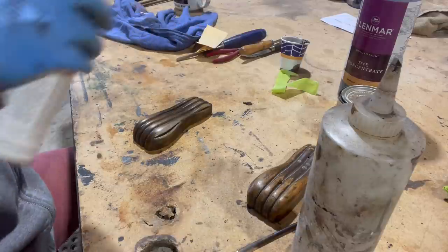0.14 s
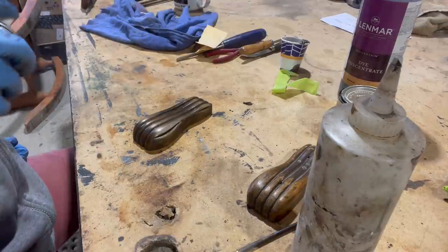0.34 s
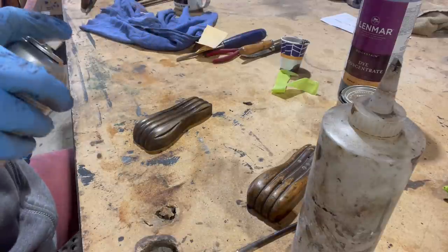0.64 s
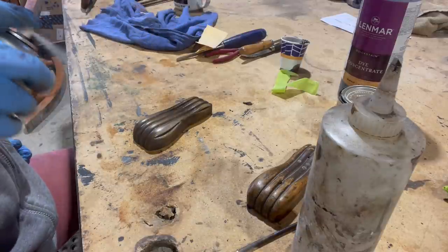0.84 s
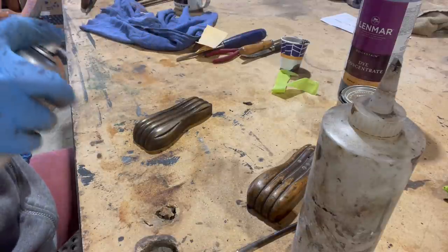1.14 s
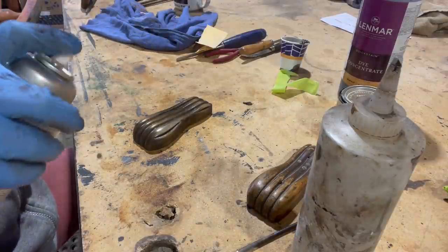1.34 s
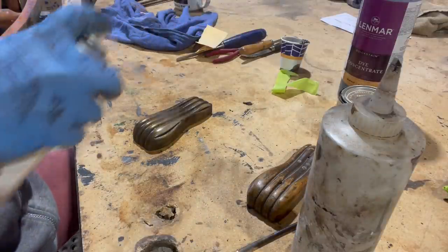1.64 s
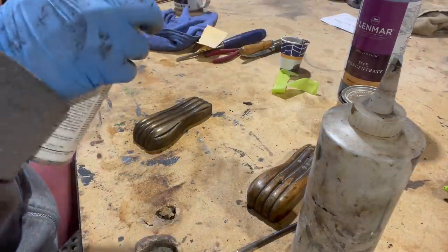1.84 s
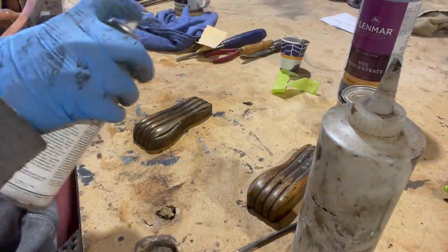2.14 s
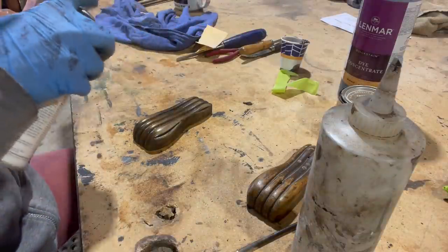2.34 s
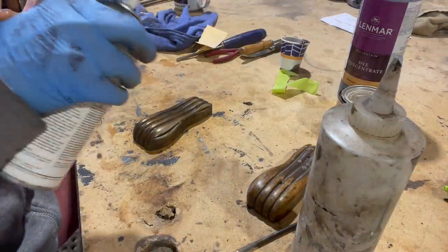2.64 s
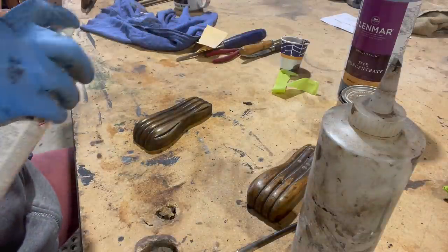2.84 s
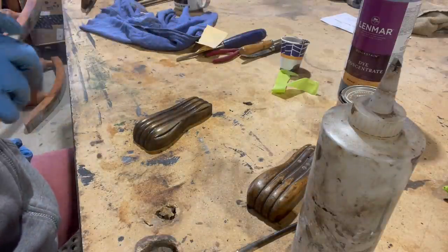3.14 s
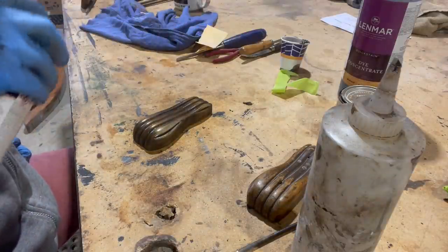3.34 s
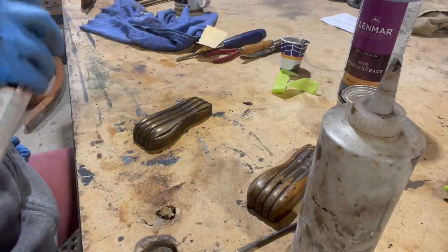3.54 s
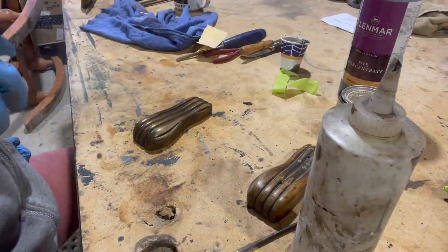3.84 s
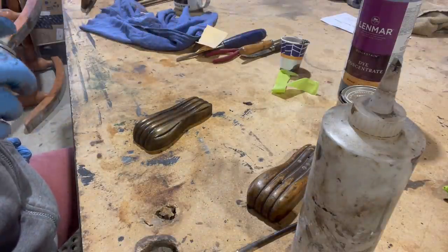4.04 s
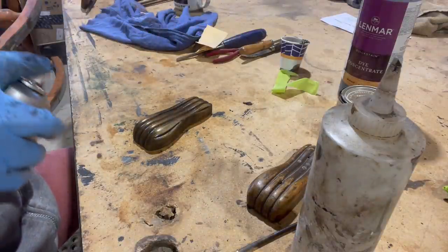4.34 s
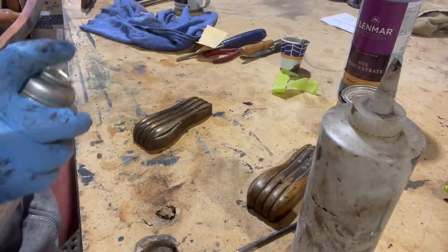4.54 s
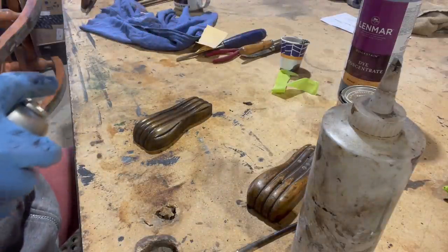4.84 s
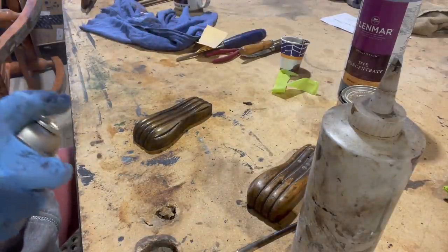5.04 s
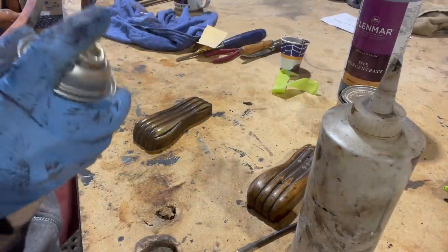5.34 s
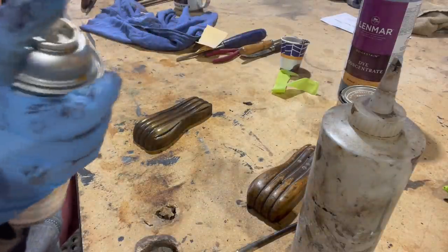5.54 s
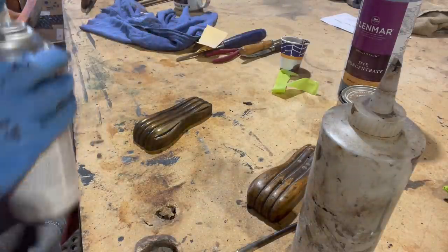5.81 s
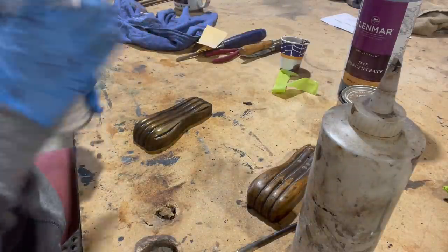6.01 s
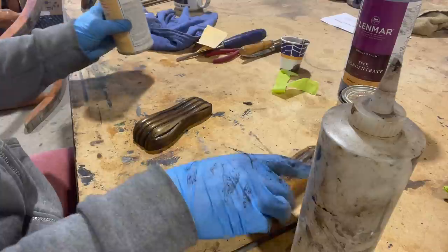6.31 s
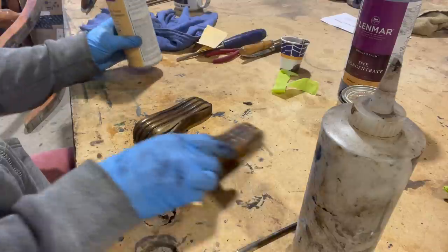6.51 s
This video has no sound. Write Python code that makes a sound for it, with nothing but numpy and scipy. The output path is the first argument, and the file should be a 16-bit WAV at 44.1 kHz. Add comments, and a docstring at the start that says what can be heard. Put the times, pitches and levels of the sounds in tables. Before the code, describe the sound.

A close stereo view of a workshop bench, with a soft low fan drone, thin air hiss and short wall reflections. From 0 to 0.4 seconds a mixing ball strikes a thin metal can in quick, hard, dry clicks, loudest at the very start, settling into tiny taps and slides. Brief spray puffs, each about a tenth of a second, start near 0.5, 0.8, 1.1, 1.6, 2.1, 2.4, 3.0, 3.3, 3.5, 4.4, 4.6 and 5.1: bright hiss with sputtering droplets, quick onset, abrupt stop, often a small button click. Faint ball ticks and slides fall between them, with a clearer knock at 3.65. After a lull, cloth rustles from about 5.6; a second can rattles with brighter, ringing clicks from 5.9 to 6.5. A wooden part bumps and scrapes dully from 6.25, with a last heavier knock at 6.6.

```python
"""In a workshop an aerosol can is shaken and tested in short puffs: ball and button ring wall modes, spray is shaped noise.
A sleeve rustles (fluttering noise) and a second can is lifted and rattles (ringing modes).
A wooden part bumps the bench (dull modes) and drags on it (modes driven by uneven contact).
A fan drones far away (narrow noise bands, faint tones) over the hiss of still air.
The walls answer with noise tails; two microphone ports hear it all out of step."""
import sys
import numpy as np
from scipy import signal
from scipy.fft import rfft, irfft, next_fast_len
from scipy.io import wavfile
from scipy.ndimage import uniform_filter1d, map_coordinates

SR = 44100
rng = np.random.default_rng(int(sys.argv[2]) if len(sys.argv) > 2 else 0)


def unload_wav(signal):
    """Save mono or channel-first audio to the path in sys.argv[1] as 16-bit WAV at rate SR, clipped to [-1, 1]."""
    wavfile.write(
        sys.argv[1],
        SR,
        np.round(np.clip(np.atleast_2d(signal).T, -1, 1) * 32767).astype(np.int16),
    )


N = 294386


def amp(db):
    """Amplitude ratio from dB."""
    return 10 ** (np.asarray(db) / 20)


def unit(x):
    """x scaled to rms 1."""
    return x / np.sqrt(np.mean(x ** 2) + 1e-20)


def along(points, hz):
    """Interpolates (f/Hz, value) points on a log frequency axis."""
    f, v = np.transpose(points)
    return np.interp(np.log(hz + 1), np.log(f + 1), v)


def gate(table):
    """Gain per sample from (t/s, level/dB) points, silent outside them."""
    return amp(np.interp(np.arange(N) / SR, *np.transpose(table), -200, -200))


def wobble(knots_per_s):
    """Smooth random curve."""
    knots = rng.standard_normal(int(N * knots_per_s / SR) + 4)
    return map_coordinates(knots, [np.arange(N) * knots_per_s / SR])


def filtered(x, response):
    """x through a complex frequency response."""
    m = next_fast_len(N + SR // 2)
    return irfft(rfft(x, m) * response(np.fft.rfftfreq(m, 1 / SR)), m)[..., :N]


def ports(pair, alike):
    """Mixes two versions of a sound into left and right; unrelated versions get the given likeness."""
    def mid_side_gains(hz):
        turn = np.arccos(np.clip(along(alike, hz), -1, 1)) / 2
        return np.array([np.cos(turn), np.sin(turn)])

    mid, side = filtered(pair, mid_side_gains)
    return np.array([mid + side, mid - side])


def rush(gain, rough_db, knots_per_s, patchy_db=1.0):
    """Pair of shaped noises, rms 1, with common flutter and shifting patches of colour."""
    z = signal.stft(rng.standard_normal((2, N)), nperseg=256)[2]
    patches = uniform_filter1d(rng.standard_normal(z.shape[1:]), size=5, axis=0)
    patches = uniform_filter1d(patches, size=8, axis=1)
    pair = signal.istft(z * amp(patchy_db * unit(patches)), nperseg=256)[1][:, :N]
    return unit(amp(rough_db * wobble(knots_per_s)) * filtered(pair, gain))


def bursts(count, low_hz, high_hz, samples):
    """Band-limited noise pairs, one per blow."""
    band = signal.butter(4, (low_hz, high_hz), "bandpass", fs=SR, output="sos")
    return unit(signal.sosfilt(band, rng.standard_normal((count, 2, samples))))


def blows(events, modes, mid_hz, top_hz, rise_cycles, crack_db, crack_t60, crack_hz, thud_db, drift):
    """Each blow rings the modes at new strengths under a short noisy crack; version two is a quarter turn off."""
    out, t = np.zeros((2, N + SR)), np.arange(SR // 12) / SR
    hz, level, t60 = np.transpose(modes)[:, :, None]
    draws = rng.standard_normal((len(events), 3, len(modes), 1))
    thuds = bursts(len(events), mid_hz, top_hz, len(t))
    cracks = bursts(len(events), top_hz, min(crack_hz, SR / 2.5), len(t))
    detune_scale = np.where(hz > mid_hz, .06, drift)  # fraction of pitch
    for event, (strength, detune, sign), thud, crack in zip(events, draws, thuds, cracks):
        s, db, favoured_hz, mid_db, top_db = event
        nearness_db = -14 * abs(np.log2(hz / favoured_hz))  # the spot struck favours one low mode
        tilt_db = np.where(hz > top_hz, top_db, np.where(hz > mid_hz, mid_db, nearness_db))
        gain = amp(level + 2.5 * strength + tilt_db - 60 * t / t60)
        gain *= 1 - np.exp(-t * hz / rise_cycles)
        ring = gain * np.exp(2j * np.pi * hz * (1 + detune_scale * detune) * t)
        pair = np.array([ring.imag.sum(axis=0), (np.sign(sign) * ring.real).sum(axis=0)])
        # small modes too dense to ring
        noise = amp(mid_db + thud_db) * thud + amp(top_db + crack_db) * crack
        pair += amp(-60 * t / crack_t60) * noise * (1 - np.exp(-t / 0.00044))
        out[:, round(s * SR):][:, :len(t)] += amp(db) * pair
    return out[:, :N]


def taps(spans, levels, pitch_hz, mid_db, top_db):
    """Unevenly spaced light blows, as event rows."""
    scatter_db, rows = 2, []
    for (start, end, rate), (first_db, db_per_s) in zip(spans, levels):
        draws = rng.standard_normal((40, 5))
        s = start + (np.arange(len(draws)) + .5 + .15 * draws[:, 0]) / rate
        level = first_db + db_per_s * (s - start) + scatter_db * draws[:, 1]
        mid = mid_db + scatter_db * draws[:, 2]
        top = top_db + scatter_db * draws[:, 3]
        pitch = pitch_hz * np.exp(.1 * draws[:, 4])
        rows += [row for row in zip(s, level, pitch, mid, top) if row[0] < end]
    return rows


def rolling(gain, modes, widen, tilt_db_per_octave, rough_db):
    """Dense uneven contact drives widened modes; negative tilt is soft contact."""
    ticks = rng.standard_normal((2, N)) * amp(rough_db * wobble(140))

    def contact(f):
        wall = 0
        for mode_hz, db, t60 in modes:
            width_hz = widen * np.log(1000) / (np.pi * t60)
            wall = wall + amp(db) * 1j * f * width_hz / (mode_hz ** 2 - f * f + 1j * f * width_hz)
        return wall * amp(tilt_db_per_octave * np.log2(1 + f / modes[0][0]))

    return gain * unit(filtered(ticks, contact))


# first can's wall modes: (f/Hz, level/dB, t60/s)
CAN_MODES = [(996, -8, 0.02), (1325, -3, .017), (1517, -3.5, 0.0089), (1770, -3, 0.014), (2400, -5.5, .013),
             (3120, -1.5, .013), (3750, -2.5, .013), (4440, -6, 0.012), (5460, -8.5, .011),
             (6400, -8, 0.011), (8440, -6.5, 0.011), (10500, -9.5, .008), (12900, -23, .008)]


def strike_can(events):
    """Blows on the first can's thin wall ring its modes."""
    return blows(events, CAN_MODES, mid_hz=2130, top_hz=5000, rise_cycles=0.68, crack_db=-2,
                 crack_t60=.011, crack_hz=15400, thud_db=-1.5, drift=.05)


# ball blows, strong and faint: (t/s, level/dB, favoured f/Hz, middle modes/dB, top and crack/dB)
BALL_BLOWS = [(0.008, -12, 1090, -7, -12), (0.041, -24.5, 1160, 4, 2), (0.046, -34, 1310, -13, -14),
              (0.057, -35, 1290, -19, -3), (0.08, -24.5, 1400, -4, -8.5), (0.094, -20.5, 1210, -12, -24),
              (0.134, -30.5, 1320, -6, -11), (0.148, -28, 1750, -12, -11.5), (0.162, -20, 1250, -6.5, -3),
              (0.181, -30, 1740, -23, -16), (0.186, -34, 1330, -3, -7), (0.221, -34.5, 1370, -8, -3.5),
              (0.239, -26.5, 1630, -2.5, -2.5), (0.254, -35, 1390, 3, -11.5), (0.265, -37, 1450, 2.5, -9.5),
              (0.283, -36, 1360, -1, -6), (0.293, -23.5, 1580, -7, -6.5), (0.316, -30.5, 1470, -9, -21.5),
              (0.336, -35.5, 1490, -5.5, -18.5), (0.36, -35.5, 1420, -4.5, -6),
              (0.375, -38.5, 1420, -5, -17.5), (1.402, -42, 1280, -9, -12), (1.472, -51.5, 1260, 1, -21),
              (1.518, -51, 1660, -2, -37), (1.829, -50, 1250, -3.5, -17), (1.999, -61.5, 1310, -3.5, -26),
              (2.056, -61.5, 1380, 2.5, -20), (2.631, -39, 1310, -4.5, -10.5), (2.646, -43, 1330, -9, -10),
              (2.906, -57, 1600, -19.5, -24), (3.168, -60, 1490, 8, -8), (3.177, -64, 1500, 10, -10),
              (3.19, -65, 1500, 8, -10), (3.229, -47.5, 1470, -8.5, -14), (3.327, -42, 1220, 11.5, 3),
              (3.46, -38.5, 1580, -11, -6), (3.477, -41, 1630, -19, -12), (3.654, -26.5, 950, -6.5, -10.5),
              (3.678, -31, 930, -11, -14.5), (3.691, -41, 912, -2.5, -9), (5.545, -65.5, 902, 4, -4.5)]
# light taps as the ball settles: (from t/s, to t/s, rate/(taps/s))
SETTLING_SPANS = [(.195, .398, 50)]
# their level: (first level/dB, change/(dB/s))
SETTLING_LEVELS = [(-41.5, -30)]


def ball_clicks():
    """The mixing ball strikes the wall, with a run of light taps as it settles."""
    settling = taps(SETTLING_SPANS, SETTLING_LEVELS, pitch_hz=1420, mid_db=-6, top_db=-16)
    return strike_can(BALL_BLOWS + settling)


# ball slides in the paint, lowest ring glides: (t/s, length/s, level/dB, first f/Hz, last f/Hz)
SLIDES = [(0, .01, -45, 1250, 1260), (.12, .03, -58, 1300, 1320), (.19, .05, -50.5, 1345, 1370),
          (.27, 0.0098, -47.5, 1380, 1390), (.31, .075, -52, 1395, 1420), (1.34, .005, -65, 1230, 1235),
          (1.47, .01, -52.5, 1290, 1300), (2.003, 0.0582, -69.5, 1266, 1330),
          (2.32, .05, -67.5, 1600, 1700), (2.53, 0.0039, -54.5, 1300, 1298), (2.66, 0.004, -64, 1300, 1310),
          (2.82, .05, -60.5, 1480, 1404), (2.99, 0.064, -50, 1335, 1518), (3.105, .05, -50, 1340, 1520),
          (3.19, .01, -63.5, 1640, 1660), (3.25, .01, -56, 1530, 1515), (3.33, .06, -55.5, 1250, 1400),
          (3.47, .015, -56.5, 1531, 1500), (3.559, .05, -55, 1550, 1506), (3.668, .03, -52, 930, 933),
          (3.91, 0.012, -72, 1140, 1150)]


def sliding():
    """Gain of the slides: each swells, holds and fades."""
    rise_db_per_s, fall_db_per_s = 649, 550
    t, gain = np.arange(N) / SR, 0
    for s, length, db, *_ in SLIDES:
        before, after = np.maximum(s - t, 0), np.maximum(t - s - length, 0)
        gain = gain + amp(db - rise_db_per_s * before - fall_db_per_s * after)
    return gain


def gliding(width_hz):
    """Narrow noise band that follows the gliding ring."""
    points = []
    for s, length, _, first_hz, last_hz in SLIDES:
        points += [(s, first_hz), (s + length, last_hz)]
    s, pitch_hz = np.transpose(points)
    phase = 2 * np.pi * np.cumsum(np.interp(np.arange(N) / SR, s, pitch_hz)) / SR
    a, b = filtered(rng.standard_normal((2, 2, N)), lambda f: 1 / (1 + (2 * f / width_hz) ** 2))
    return unit(a * np.cos(phase) + b * np.sin(phase))


def ball_slides():
    """The ball slides along the wall: soft contact on the modes plus a gliding ring."""
    wall = rolling(1, CAN_MODES[:7], widen=1.6, tilt_db_per_octave=-4, rough_db=2.5)
    return sliding() * (amp(-5.5) * wall + amp(-3.5) * gliding(width_hz=260))


# fan in the shop's air: (f/Hz, width/Hz, level/dB)
DRONE_BANDS = [(44.7, 6.7, -11), (69.3, 15, 0.5), (101, 14, -11.5), (114.2, 7.7, -6), (165, 8.3, -16)]
# drone level: (t/s, level/dB)
DRONE_LEVEL = [(0.0, -53.5), (0.2, -60.5), (1.11, -58), (1.47, -62.5), (2.0, -59.5), (2.69, -58.5),
               (4.03, -55.5), (4.61, -56), (4.91, -57), (5.3, -54), (5.62, -58), (5.97, -51), (6.19, -55),
               (6.68, -50.5)]
# motor tones: (f/Hz, level/dB)
WHINE = [(599, -90), (897, -89.5)]


def fan():
    """Low rumble in a few narrow noise bands plus faint wavering motor tones."""
    def bands(f):
        return sum(amp(db) / (1 + (2 * (f - c) / width) ** 2) for c, width, db in DRONE_BANDS)

    t, tones = np.arange(N) / SR, 0
    for hz, db in WHINE:
        tones = tones + amp(db + 3.5 + 0.83 * wobble(3.8)) * np.sin(2 * np.pi * hz * t)
    return gate(DRONE_LEVEL) * rush(bands, rough_db=1, knots_per_s=2, patchy_db=.5) + tones


# still air spectrum: (f/Hz, relative density/dB)
AIR = [(120, 2.5), (200, -3.5), (350, -14), (800, -15), (1400, -22), (3000, -30.5), (7500, -29.5),
       (12000, -36), (14300, -36), (15000, -44.5), (15700, -66)]


def still_air():
    """Steady hiss: shaped noise above 60 Hz."""
    return amp(-69.5) * rush(lambda hz: amp(along(AIR, hz)) * (hz > 60), rough_db=-3.1, knots_per_s=7.1)


# puffs: (valve opens t/s, shuts t/s, jet open level/dB, jet end level/dB, droplets/dB, breathy bottom/dB)
PUFFS = [(0.473, 0.59, -42, -40.5, -48.5, -52), (.774, 0.873, -40, -37.5, -44.5, -49),
         (1.099, 1.187, -39.5, -39.5, -45, -53.5), (1.584, 1.706, -43, -39, -41, -49),
         (2.131, 2.209, -43, -42, -44, -51.5), (2.397, 2.49, -47.5, -37.5, -42, -53),
         (2.972, 3.072, -43.5, -41.5, -48, -70), (3.261, 3.354, -46.5, -41.5, -47.5, -54),
         (3.541, 3.604, -42.5, -41, -53.5, -53), (4.362, 4.444, -39.5, -42.5, -43.5, -51),
         (4.637, 4.734, -43, -38, -41.5, -51), (5.135, 5.21, -43, -39, -39, -49.5)]


def flow(levels, late_s=0):
    """Gain of the puffs from (open dB, end dB): power-law opening, hold, steep fall."""
    opening_s, opening_power, fall_db_per_s = 0.024, 1.4, 1000
    gain, t = np.zeros(N), np.arange(SR // 3) / SR
    for (start, shut, *_), (first_db, last_db) in zip(PUFFS, levels):
        length = shut - start
        hold_db = np.interp(t, [opening_s, length], [first_db, last_db])
        hold_db -= fall_db_per_s * np.maximum(t - length - late_s, 0)
        opening = np.minimum(t / opening_s, 1) ** opening_power
        gain[round(start * SR):][:len(t)] += opening * amp(hold_db)
    return gain


# jet spectrum: (f/Hz, relative density/dB)
JET = [(5000, -17.5), (6500, -20), (8500, 0), (10500, -3.5), (12000, 0.5), (14000, 3), (15800, -9)]
# droplet spectrum: (f/Hz, relative density/dB)
DROPLETS = [(2000, -9), (2800, 1.5), (3700, 4.5), (4200, 5.5), (4900, 7.5), (5500, 0), (6000, 2),
            (7000, 2.5), (8500, -15.5)]
# pushed-air spectrum: (f/Hz, relative density/dB)
BOTTOM = [(120, -27), (250, -9), (600, -20), (1000, -0.5), (1300, 2), (2200, -2.5), (3200, -5.5),
          (5000, -43)]


def spray():
    """The jet hisses at the nozzle, droplets sputter below it, pushed air breathes at the bottom."""
    drain_s = 0.0086  # droplets and pushed air outlast the jet
    rows = np.array(PUFFS)
    jet = rush(lambda hz: amp(along(JET, hz)), rough_db=1.26, knots_per_s=240, patchy_db=3.0)
    droplets = rush(lambda hz: amp(along(DROPLETS, hz)), rough_db=0.5, knots_per_s=70, patchy_db=3.0)
    bottom = rush(lambda hz: amp(along(BOTTOM, hz)), rough_db=1.0, knots_per_s=59, patchy_db=3.0)
    out = flow(rows[:, 2:4]) * jet
    out += flow(rows[:, 4:5] + [0, -2], drain_s) * droplets  # sags 2 dB
    return out + flow(rows[:, 5:6] + np.zeros(2), drain_s) * bottom


# button clicks: (t/s, level/dB, top and crack/dB)
BUTTON = [(0.769, -53.5, -19), (1.091, -65.5, -21), (1.582, -53, -20), (2.145, -53, -4), (2.391, -62.5, -9),
          (2.402, -49, -13.5), (2.976, -52, -20), (3.269, -58.5, 2), (3.549, -46.5, 2),
          (4.352, -56.5, -23.5), (4.63, -64, -22), (4.646, -53, -3), (5.125, -57.5, -21)]


def button():
    """Button clicks ring the first can's modes."""
    pitch_hz, mid_db = 1500, 6
    return strike_can([(s, db, pitch_hz, mid_db, top_db) for s, db, top_db in BUTTON])


# rustle level: (t/s, level/dB)
SLEEVE_LEVEL = [(5.5, -83), (5.626, -67.5), (5.9, -63), (5.96, -54), (6.092, -60.5), (6.138, -58),
                (6.306, -78), (6.37, -60), (6.504, -69.5), (6.58, -73.5)]
# cloth spectrum: (f/Hz, relative density/dB)
CLOTH = [(500, 3), (1500, -2.5), (4000, -5), (7500, 2), (11000, -2), (15500, -7.5)]


def sleeve():
    """Cloth rustles as the arm reaches out: fluttering noise."""
    return gate(SLEEVE_LEVEL) * rush(lambda hz: amp(along(CLOTH, hz)), rough_db=1.5, knots_per_s=200)


# second can's ball blows: (t/s, level/dB, favoured f/Hz, middle modes/dB, top and crack/dB)
SECOND_BALL_BLOWS = [(5.915, -52, 1540, -13, 5.5), (5.9424, -40, 1640, 3.5, 3),
                     (5.9628, -39.5, 2050, -3, 5), (5.9754, -51, 1660, 8, 13.5),
                     (5.9878, -45.5, 1640, 0, 1), (6.0004, -50, 1660, 0, 10.5), (6.0467, -52.5, 1950, 6, 7),
                     (6.0614, -50, 2100, 1, 7), (6.095, -41.5, 1470, 5, 2), (6.1235, -39.5, 1660, -3, -4),
                     (6.1334, -45, 1560, -4, -4), (6.2701, -33, 1580, -14.5, -10.5),
                     (6.2889, -43.5, 1400, -2, 0.5), (6.3034, -44, 1600, -3, -1.5),
                     (6.3195, -37.5, 1600, -11, -10.5), (6.3284, -45.5, 1524, -5, -4),
                     (6.3425, -34, 1600, -17, -15), (6.3879, -47, 1660, -10, -18),
                     (6.4078, -47.5, 1620, 3, -5.5)]
# second can's wall modes: (f/Hz, level/dB, t60/s)
SECOND_CAN_MODES = [(1613, -2, 0.045), (2015, 1, 0.013), (2525, 0, 0.013), (3140, 1, 0.014),
                    (4000, 4, 0.016), (5200, -16, 0.0091), (6800, -1.5, 0.024), (9120, -2, 0.021),
                    (9360, -8, 0.016), (13320, -10.5, 0.0053)]
# second ball slides: (t/s, level/dB)
SECOND_ROLL_LEVEL = [(5.89, -89), (5.915, -53.5), (5.995, -49.5), (6.035, -62.5), (6.18, -56),
                     (6.22, -60.5), (6.285, -57), (6.44, -58), (6.52, -56.5), (6.56, -87)]
# further taps: (from t/s, to t/s, rate/(taps/s))
CLATTER_SPANS = [(5.9, 5.94, 100), (6.006, 6.085, 70), (6.14, 6.195, 150), (6.35, 6.48, 70)]
# their level: (first level/dB, change/(dB/s))
CLATTER_LEVELS = [(-66, 87), (-50, -32), (-54, -22), (-52, -36)]


def second_can():
    """The second can's ball strikes, clatters and slides on its wall modes."""
    clatter = taps(CLATTER_SPANS, CLATTER_LEVELS, pitch_hz=1720, mid_db=-0.5, top_db=-0.5)
    rattle = blows(SECOND_BALL_BLOWS + clatter, SECOND_CAN_MODES, mid_hz=2100, top_hz=5810, rise_cycles=0.57,
                   crack_db=2, crack_t60=0.014, crack_hz=15400, thud_db=2.5, drift=0.018)
    roll = rolling(gate(SECOND_ROLL_LEVEL), SECOND_CAN_MODES, widen=4.2, tilt_db_per_octave=-1.5, rough_db=2.0)
    return rattle + roll


# wooden part bumps the bench: (t/s, level/dB, favoured f/Hz, middle modes/dB, top and crack/dB)
BUMPS = [(5.937, -37, 156, -11, -23), (6.265, -42.5, 196, -24, -15), (6.285, -35.5, 146, -8.5, -4),
         (6.294, -33.5, 153, -6, 2), (6.426, -41.5, 280, -0.5, 0), (6.434, -35.5, 244, -20, -2),
         (6.446, -35, 293, -4, -2.5), (6.457, -32.5, 275, -22, 4), (6.471, -41, 231, 3, 4),
         (6.492, -36, 156, -17, -19), (6.59, -29, 287, -9.5, -41), (6.602, -37, 291, -10, -30),
         (6.618, -38.5, 166, -10, -30), (6.651, -39.5, 185, -15, -27)]
# bench modes: (f/Hz, level/dB, t60/s)
BENCH_MODES = [(157, -5.5, 0.084), (217, 2, 0.0426), (272, -4, 0.059), (348, 1, 0.05), (492, 1.5, .02),
               (760, 3, 0.013), (1063, -1, 0.012), (1210, -18, 0.014)]
# wooden part scrapes: (t/s, level/dB)
DRAG_LEVEL = [(6.24, -62), (6.38, -60.5), (6.476, -56), (6.58, -76.5), (6.675, -76)]


def wooden_part():
    """The part bumps and scrapes the bench: dull, dry modes."""
    bumps = blows(BUMPS, BENCH_MODES, mid_hz=450, top_hz=900, rise_cycles=0.37, crack_db=-10.5,
                  crack_t60=0.015, crack_hz=1500, thud_db=-7, drift=.05)
    return bumps + rolling(gate(DRAG_LEVEL), BENCH_MODES[3:], widen=1.5, tilt_db_per_octave=-2.5, rough_db=3)


# decay of the walls' answer: (f/Hz, t60/s)
SHOP_DECAY = [(200, 0.41), (2000, 0.38), (6000, .32), (10000, .24), (14000, 0.19)]


def shop(x):
    """Walls: each frequency dies at its own speed; each eighth of a second gets a freshly drawn noise tail."""
    out, step = np.zeros((2, N + SR)), SR // 8
    delay = 200  # samples
    for start in range(0, N, step):
        hz, t, z = signal.stft(rng.standard_normal((2, SR // 2)), SR, nperseg=256)
        decay = amp(-60 * t / along(SHOP_DECAY, hz)[:, None])
        tail = signal.istft(z * decay, SR, nperseg=256)[1]
        tail /= np.linalg.norm(tail[0])
        answer = signal.fftconvolve(x[None, start:start + step], tail, axes=1)
        out[:, start + delay:][:, :answer.shape[1]] += answer
    return out[:, :N]


# likeness of the ports, fan and air: (f/Hz, likeness)
AIR_ALIKE = [(100, 0.92), (300, 0.41), (700, .2), (4000, .2), (7000, 0.95), (11000, 1), (15000, .7)]
# likeness, spray, sleeve and walls: (f/Hz, likeness)
NEAR_ALIKE = [(300, 0.52), (1000, 0.18), (3000, 0.74), (5800, 0.22), (7400, 0.71), (9500, 0.99), (11000, 1),
              (13000, 1), (15000, 0.38)]
# likeness, cans and wood: (f/Hz, likeness)
HIT_ALIKE = [(200, 0.67), (500, 0.6), (1300, 0.69), (3000, 0.4), (5800, 0.25), (7400, 0.18), (9500, 0.66),
             (11000, 1), (15000, 0.69)]


def scene():
    """Near sources, their wall answer and the background, spread over two ports."""
    hits = ball_clicks() + ball_slides() + button() + second_can()
    background = fan() + still_air()
    hiss = spray() + sleeve()
    wood = wooden_part()
    walls = shop(amp(-14.0) * hiss[0] + amp(-14.5) * hits[0] + amp(-14.0) * wood[0])
    near = ports(hiss + walls, NEAR_ALIKE) + ports(hits + wood, HIT_ALIKE)
    return near + ports(background, AIR_ALIKE) * amp([[.8], [-.8]])  # left louder


# left port leads: (f/Hz, phase/rad)
LEAD = [(100, 0.11), (1000, 0.55), (2000, 1.2), (4000, 1.57), (7200, 2.82), (9600, 4.9), (11400, 6.25),
        (13100, 6.3), (14800, 7.6)]


def record(dry):
    """The ports hear the sound out of step; a smooth edge ends the band."""
    limit_hz, edge_hz = 15800, 400

    def response(hz):
        edge = np.sin(np.pi / 2 * np.clip((limit_hz - hz) / edge_hz + .5, 0, 1)) ** 2
        return np.exp([[.5j], [-.5j]] * along(LEAD, hz)) * edge

    return filtered(dry, response)


dry = scene()
out = record(dry)
unload_wav(out)
```